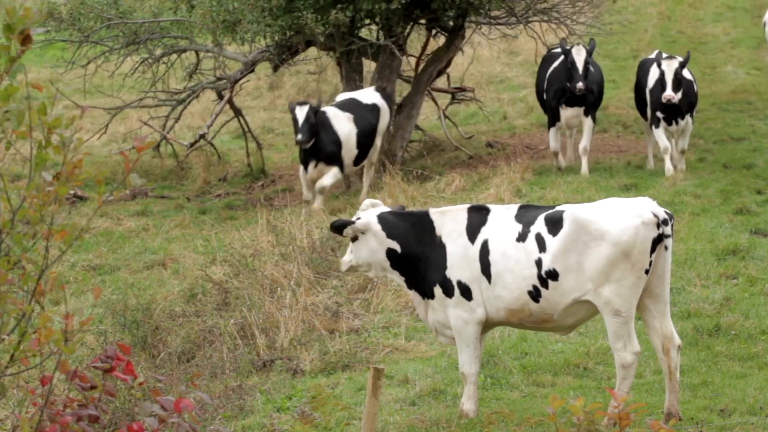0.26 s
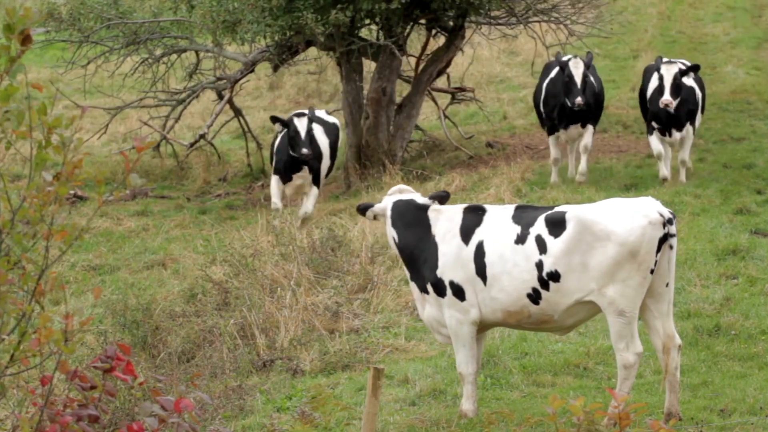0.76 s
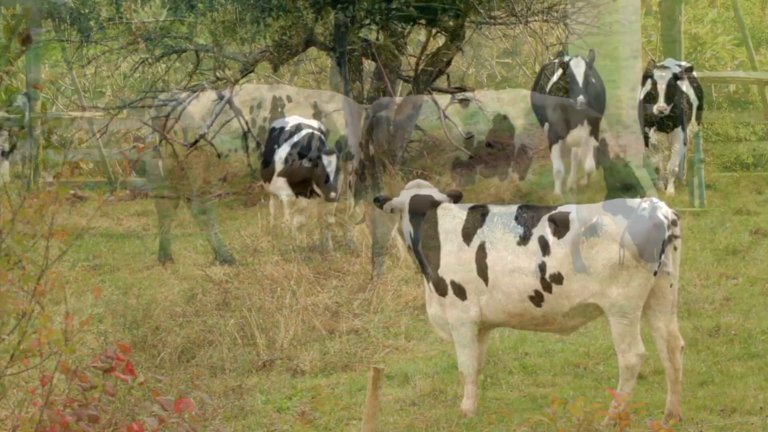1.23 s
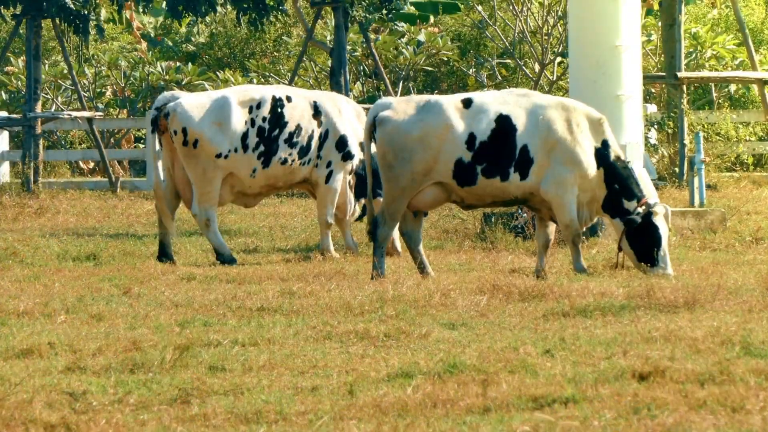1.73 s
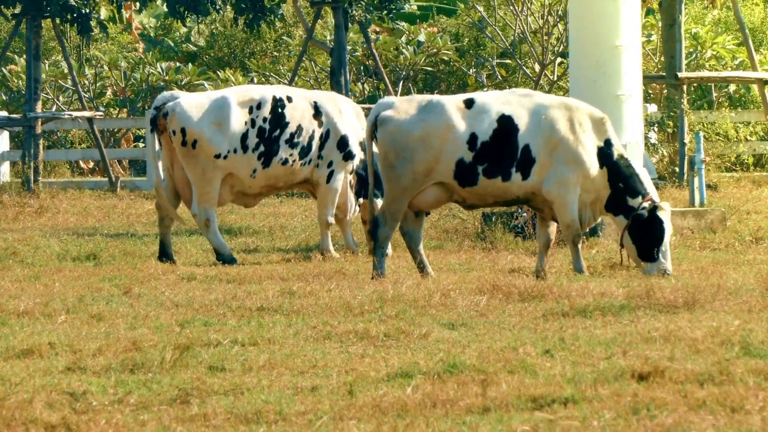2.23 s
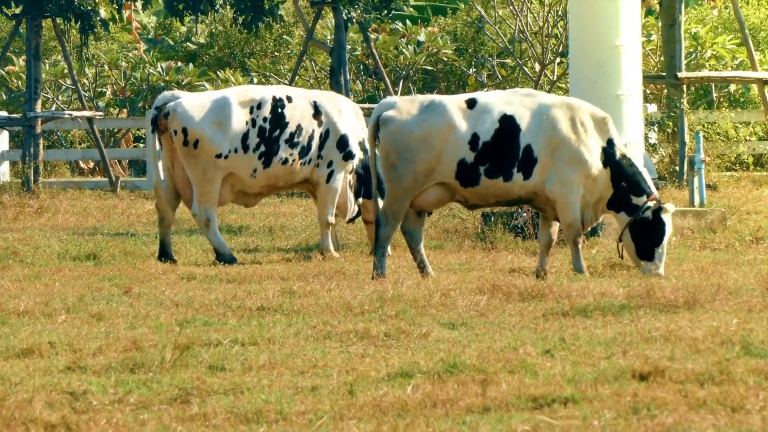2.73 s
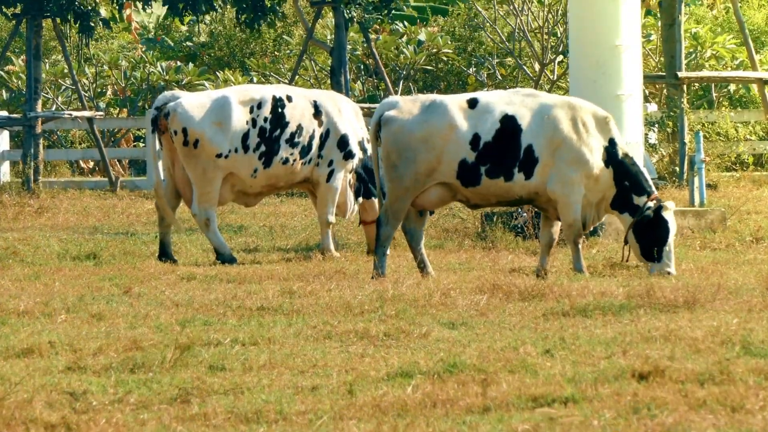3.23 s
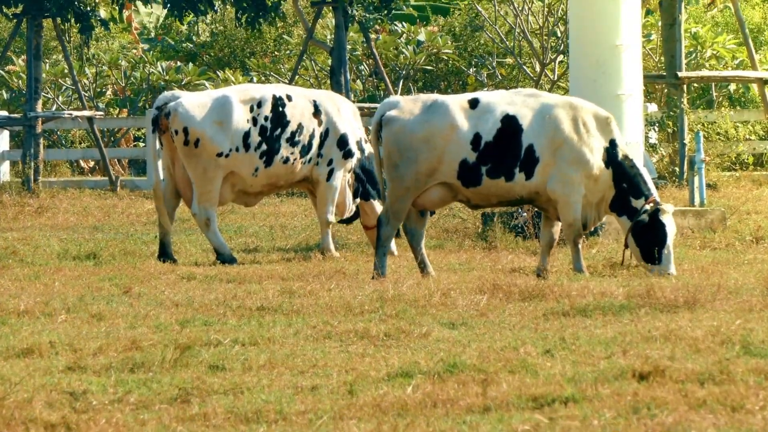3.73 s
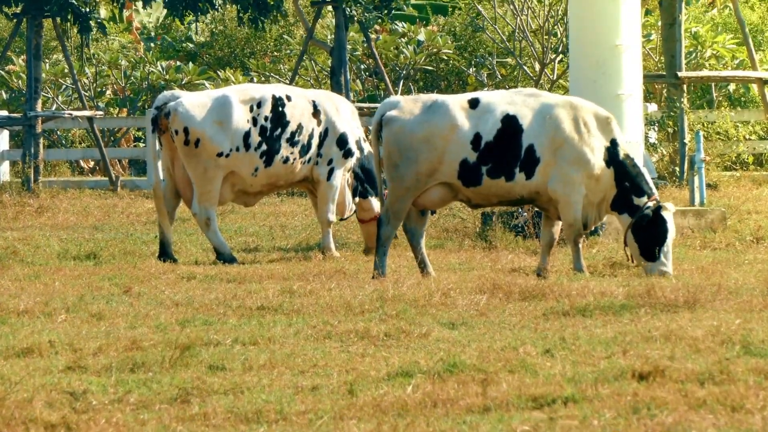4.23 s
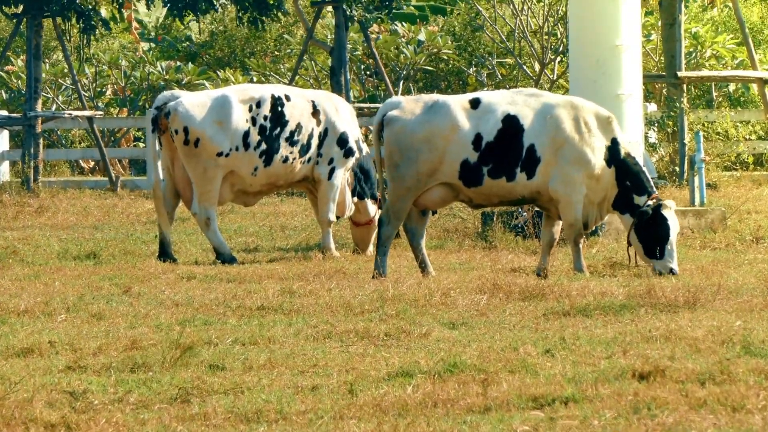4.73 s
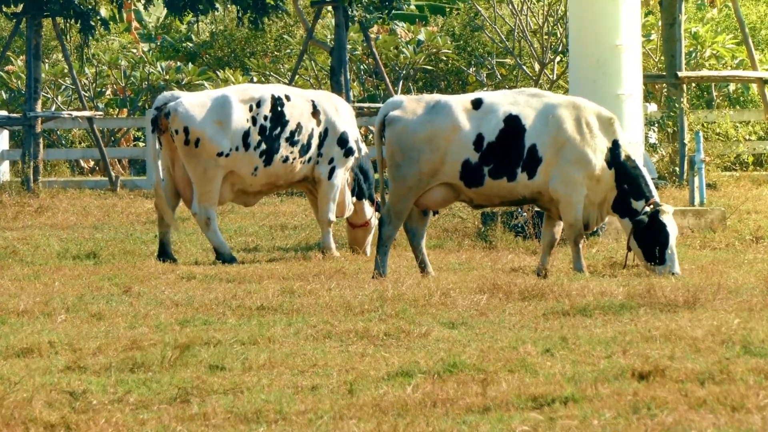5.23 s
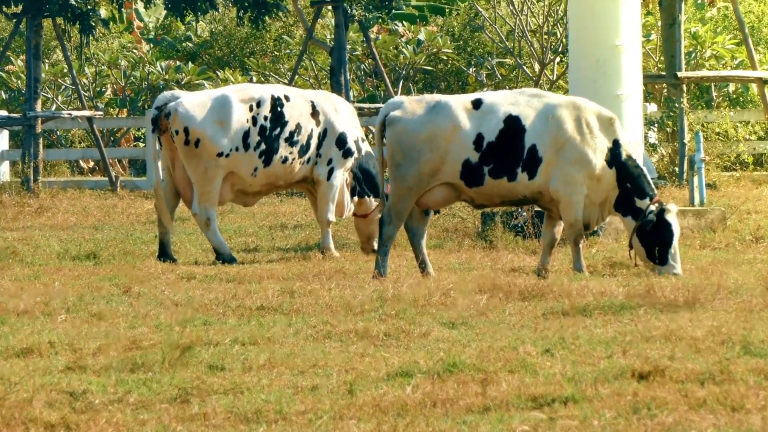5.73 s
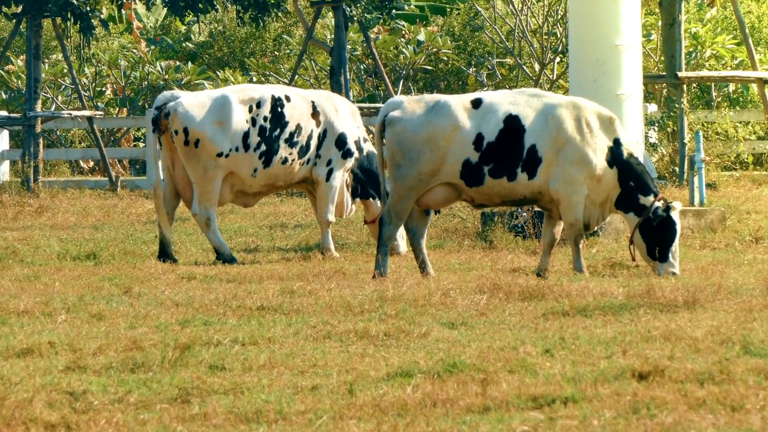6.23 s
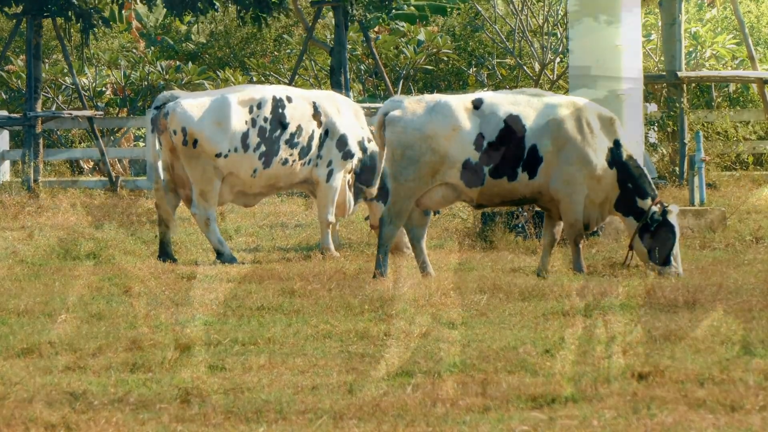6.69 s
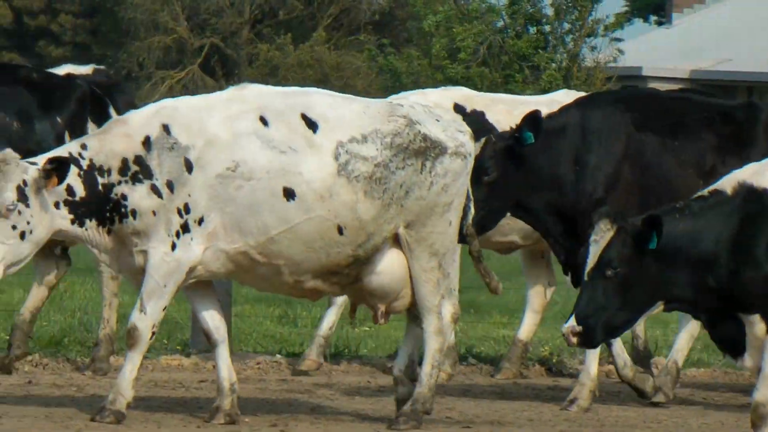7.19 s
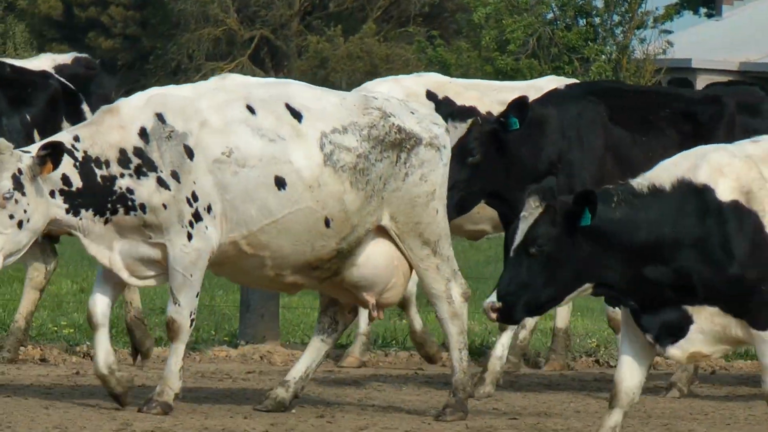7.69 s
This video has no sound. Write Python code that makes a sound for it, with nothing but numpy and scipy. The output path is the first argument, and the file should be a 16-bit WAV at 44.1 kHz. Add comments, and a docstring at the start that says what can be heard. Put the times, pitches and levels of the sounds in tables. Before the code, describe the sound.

Quiet pasture with birdsong; one near cow's rising moo bursts into a short loud bellow and rasping breath, before a herd shuffles in with a faint far moo.

```python
"""Pasture at the edge of a wood. Songbirds (gliding sines with a noise tail from the trees) call over a distant
rumble and a slow sway of wind pressure (shaped noise). From 3.4 s a near cow hums a rising moo and bellows
(throat-weighted harmonics, breath noise, nose and growl bands), rustles (noise puffs) and, from 4.6 s, draws a
hoarse breath (uneven slaps and noise through resonances). At 6.8 s the herd fades in (patchy noise, ringing
ticks); at 7 s another cow starts a low moo further off (harmonics)."""
import sys
import numpy as np
from scipy import signal
from scipy.fft import rfft, irfft
from scipy.io import wavfile

SR = 44100
rng = np.random.default_rng(int(sys.argv[2]) if len(sys.argv) > 2 else 0)


def materialize(psi):
    """Save the field psi as 16-bit PCM at rate SR to the path in sys.argv[1].

    A 1-D psi becomes a single channel; in a 2-D psi each row is a channel.
    """
    bounded = np.clip(np.atleast_2d(psi).T, -1, 1)
    quanta = np.round(bounded * 32767).astype(np.int16)
    wavfile.write(sys.argv[1], SR, quanta)


N = 350595
T = np.arange(N) / SR

# Near moo: (time [s], pitch [Hz], level [dB])
MOO_CURVE = [(3.4, 80.3, -56), (3.57, 91, -37.5), (3.75, 101.1, -36.5), (3.92, 120.7, -34.5),
             (3.985, 134.7, -37), (4.005, 137.8, -21.5), (4.1, 152.3, -18), (4.2, 172, -12),
             (4.25, 175.5, -13.5), (4.32, 182, -5.5), (4.38, 183.7, -7.5), (4.45, 183.2, -8),
             (4.505, 180.5, -8.5), (4.536, 170, -10), (4.543, 160, -23), (4.6, 135, -27), (4.625, 125, -33),
             (4.65, 120, -55)]
# Mouth: (time [s], opening [0 shut, 1 opening, 2 wide])
MOUTH_CURVE = [(3.5, 0.16), (3.95, 0.51), (4.06, 1.225), (4.26, 1.284), (4.32, 1.74), (4.5, 1.68),
               (4.55, 1.12)]
# Throat gain on the harmonics, by mouth position: (frequency [Hz], gain [dB])
THROAT_SHUT = [(47, -30), (80, 18.5), (203, 16), (302, -2), (709, 2), (957, -5.5), (1120, -21), (1420, -10),
               (1920, -30), (2010, -16), (2360, -25), (2940, -19), (3500, -19), (4550, -59), (7700, -120)]
THROAT_OPENING = [(71, -33.5), (120, -1), (303, 12.5), (463, -5), (799, 12), (1130, -9), (1510, -9),
                  (2050, -25), (2450, -26), (2650, -45), (3220, -46), (3580, -47), (4500, -60),
                  (5850, -81.5), (9900, -120)]
THROAT_WIDE = [(88, -33.5), (150, -6.5), (194, 6.5), (357, -18.5), (517, 18), (563, 0.5), (901, -35.5),
               (1230, -4.5), (1480, -17), (2370, -41.5), (2770, -32), (3060, -63.5), (3740, -33),
               (4500, -57), (5850, -90), (9900, -120)]
# Breath noise spectrum, mouth shut and open: (frequency [Hz], relative density [dB per Hz])
BREATH_SHUT_SPECTRUM = [(150, -22), (700, -12), (1150, -28), (1500, -21), (1700, -28), (1900, -20),
                        (2150, -30), (2700, -35), (3050, -32), (3550, -30), (4300, -36), (5200, -34),
                        (6300, -38), (7500, -46), (12000, -46), (15500, -56)]
BREATH_OPEN_SPECTRUM = [(110, -33.5), (500, -13.5), (800, -13.5), (1400, -15.5), (2000, -30.5), (2700, -28),
                        (3100, -48.5), (3700, -38), (4500, -41.5), (6000, -37.5), (7500, -44), (9000, -45),
                        (12000, -49.5), (15500, -62)]
# Nose resonances, and last a wide growl band near 1600 Hz: (frequency [Hz], width [Hz])
NOSE_AND_GROWL_BANDS = [(1874, 73), (3100, 140), (3540, 490), (5050, 410), (1600, 420)]
# Swells of the nose, and last of the growl as the mouth opens:
# (band index, peak time [s], peak level [dB], rise [dB/s], fall [dB/s])
NOSE_AND_GROWL_SWELLS = [(0, 3.78, -57, 150, 40), (0, 3.85, -52.5, 60, 40), (1, 3.68, -55, 76, 60.5),
                         (1, 4.035, -45.5, 354, 148), (2, 3.72, -49.5, 116, 61), (3, 3.68, -54, 164, 100),
                         (4, 4.11, -33.5, 129, 199)]
# Hoarse breath: (time [s], level [dB])
HOARSE_CURVE = [(4.6, -63), (4.67, -23), (4.78, -18.5), (4.95, -16.5), (5.0, -22), (5.06, -17.5),
                (5.26, -26.5), (5.36, -39), (5.49, -46.5), (5.6, -76)]
# Mouth resonances in the hoarse breath: (frequency [Hz], width [Hz], level [dB])
HOARSE_RESONANCES = [(585, 90, -10), (685, 55, -1), (800, 55, -2.5), (920, 110, -14), (1050, 120, -17),
                     (1300, 70, -20), (1600, 250, -22), (2130, 120, -34)]
# Air noise in the hoarse breath: (frequency [Hz], relative density [dB per Hz])
HOARSE_AIR_SPECTRUM = [(100, -13.5), (200, 3), (400, 1.5), (1000, -17), (1600, -9), (2200, -29.5),
                       (3000, -30.5), (4500, -35), (5800, -33.5), (7000, -37), (11000, -44), (15500, -48.5)]
# Rasps high in the throat: (peak time [s], peak level [dB])
THROAT_RASPS = [(4.69, -46.5), (4.86, -57.5), (5.049, -63), (5.26, -50.5)]
# Rustles: (time [s], rise [s], hold [s], fall [s], level before RUSTLE_BOOST_DB [dB])
RUSTLE_PUFFS = [(3.558, 0.021, .01, .09, -66.5), (3.893, 0.011, 0.012, 0.15, -66.5),
                (4.752, 0.023, 0.017, 0.046, -62), (5.032, 0.014, 0.038, 0.048, -52),
                (5.205, 0.023, .015, 0.048, -65), (5.331, 0.018, 0.022, 0.18, -61)]
# Rustle spectrum: (frequency [Hz], relative density [dB per Hz])
RUSTLE_SPECTRUM = [(880, -29.5), (1500, -9), (1920, -7.5), (2110, -6.5), (3070, -11), (4450, -13.5),
                   (6860, -19), (11300, -17.5), (15600, -31.5)]
# Farm building echoes, before their treble loss: (delay [s], level [dB])
BUILDING_ECHOES = [(.045, -20), (.085, -29), (.125, -24), (.16, -23)]
# Bird notes by kind of call: (delay [s], length [s], start, middle, end pitch [Hz], level against the call [dB])
CALL_NOTES = { "phrase": [(.0, .012, 2300, 2400, 2450, -2), (.01, .01, 2100, 2080, 2050, -3),
              (.016, .013, 2650, 2750, 2800, -3), (.022, .018, 2200, 2150, 2100, -1),
              (.035, .013, 2800, 2870, 2950, -3), (.042, .026, 2020, 2000, 2000, 0),
              (.072, .014, 1780, 1700, 1650, -7), (.088, .014, 1760, 1690, 1650, -8),
              (.103, .014, 1760, 1690, 1650, -8), (.118, .016, 1750, 1680, 1640, -10)],
              "dip": [(0, .025, 3550, 3850, 3750, -5), (.023, .042, 3750, 3450, 3450, 0)],
              "flick": [(0, .025, 3500, 4300, 4850, 0)], "upslur": [(0, .03, 4500, 5000, 5150, -2),
              (.03, .06, 5150, 5100, 5050, 0)], "downslur": [(0, .08, 4600, 3850, 3750, 0)],
              "seep": [(0, .04, 6600, 7300, 7850, 0), (.035, .26, 7850, 7700, 7570, -1)],
              "chip": [(0, .03, 3300, 2900, 2300, 0)], "burr": [(0, .02, 2100, 2900, 3800, -2),
              (.018, .012, 3200, 2800, 2500, -4), (.03, .014, 2600, 2950, 3100, -2)],
              "hook": [(0, .055, 3900, 4450, 3300, 0), (.06, .04, 3350, 3500, 3500, -2)],
              "rise": [(0, .08, 2600, 3000, 3300, 0)], "arch": [(0, .045, 2450, 2750, 2680, 0)],
              "drop": [(0, .047, 2200, 1700, 1800, 0)], "pipe": [(0, .05, 1400, 1380, 1365, 0)],
              "glide": [(0, .5, 5300, 4700, 4150, 0)], "slide": [(0, .015, 2300, 2700, 2500, -2),
              (.012, .04, 2400, 2150, 1950, 0), (.055, .05, 1850, 1720, 1680, -3)],
              "peep": [(0, .04, 3400, 3450, 3400, 0)], "held": [(0, .14, 2080, 2000, 1920, 0)]}
# Bird calls by kind: (time [s], pitch shift [semitones], level [dB])
CALL_TIMES = { "slide": [(2.98, 0, -60), (3.272, 0, -58), (3.565, 0, -57), (3.86, 0, -58)],
              "phrase": [(5.572, 0.012, -51.5), (5.812, 0, -51), (6.055, 0, -50.5), (6.305, 0.006, -51.5),
              (6.568, 0.011, -51.5), (6.815, 0, -53), (7.085, 0, -50), (7.345, 0.00042, -51),
              (7.61, 0, -53), (7.875, 0.0044, -50.5)], "dip": [(2.777, 0.043, -48.5), (5.915, 0.026, -46),
              (7.3, 0.13, -45)], "flick": [(.622, 0.0042, -52.5), (5.965, 0, -51.5)],
              "upslur": [(.005, 0, -63), (.925, 0, -68.5), (2.045, 0, -66), (3.295, 0, -67),
              (5.555, 0.13, -68.5)], "downslur": [(.15, 1, -62.5), (1.86, 3, -74), (2.17, 3, -63),
              (5.72, 1.5, -62), (6.175, 0, -65)], "seep": [(1.065, 0, -76), (2.915, 0, -78)],
              "chip": [(.33, 3, -68), (.8, 1.5, -66), (1.245, -3, -60.5), (1.255, 4, -65),
              (1.285, 2.5, -64), (1.56, 2, -64), (1.68, 3, -65.5), (1.895, -7, -62), (2.04, 3, -67),
              (5.62, 3, -64)], "rise": [(.63, 0.0066, -64), (.865, 0.0043, -61)],
              "burr": [(.005, -1.7, -59), (.69, -1.1, -58.5), (1.455, -0.6, -54.5), (1.49, -1.1, -59),
              (1.76, -1, -60), (2.23, -0.11, -57.5), (2.665, 0.14, -64), (3.085, -0.057, -59)],
              "hook": [(1.01, 0.23, -64.5), (1.385, 0.77, -65.5)], "arch": [(.445, 0.2, -67),
              (5.66, 3.5, -65), (5.8, 1.5, -56), (5.908, -0.5, -51), (6.25, 0.5, -53), (6.35, 2, -53.5),
              (6.72, 0.5, -54.5), (6.835, 0, -50.5), (7.23, .5, -58)], "drop": [(2.36, 0, -65),
              (2.445, 0, -64), (2.61, 0, -64), (2.67, 0, -63), (2.745, 0, -63)],
              "pipe": [(1.48, 0.012, -64), (1.81, 0, -60), (2.14, 0, -62)], "glide": [(2.62, 0, -79)],
              "peep": [(.585, 0, -50.5), (.41, -1.6, -65), (6.47, 2, -65)], "held": [(.19, 0.018, -67.5),
              (.88, 0, -70)]}
# Far moo: (time [s], pitch [Hz], level [dB])
FAR_MOO_CURVE = [(7.0, 95.7, -69), (7.14, 94.4, -53.5), (7.25, 104, -48), (7.36, 110.9, -65),
                 (7.5, 102.5, -47.5), (7.58, 103.1, -52), (7.72, 113.5, -47), (7.87, 112.9, -52.5),
                 (7.95, 117.6, -54)]
# Far cow's throat, before the brightness tilt: (frequency [Hz], gain [dB])
FAR_THROAT_GAIN = [(90, 2.5), (230, 0.5), (400, -25), (790, -2), (1100, -18), (1470, -5.5), (1700, -18),
                   (2150, -4.5), (2450, -33), (2750, -2), (3300, -21), (4080, -3), (4600, -27)]
# Herd shuffle: (frequency [Hz], relative density [dB per Hz])
HERD_SPECTRUM = [(30, -7), (60, -1.5), (102, -3.5), (147, -2.5), (211, -6.5), (274, -21), (437, -17.5),
                 (3150, -17.5), (7630, -26), (9500, -36.5), (10500, -61), (15000, -73)]
# Lone hoof ticks: (time [s], impulse strength before the resonances [dB])
HOOF_KNOCKS = [(7.026, -11.5), (7.049, -15), (7.24, -14)]
# Distant rumble: (frequency [Hz], relative density [dB per Hz])
RUMBLE_SPECTRUM = [(8, -4), (20, -6), (45, -5), (103, -1.5), (153, -5.5), (282, -14), (686, -15.5),
                   (1010, -20.5), (1540, -34), (2500, -41), (4500, -47), (5850, -53), (9000, -58),
                   (15500, -61)]

# breath against the voice: mouth shut, wide, after the break
BREATH_HUM_DB, BREATH_BELLOW_DB, BREATH_SPENT_DB = -11, -26.5, -14.5
# voice unrest at its most, with the mouth half open; flicker is then weighted by harmonic number
UNSTEADY_WOBBLE, UNSTEADY_FLICKER_DB = .004, 2.6
# the voice breaks into rough noise as the bellow stops
BREAK_S, BREAK_DB, BREAK_RISE_DB_PER_S, BREAK_FALL_DB_PER_S = 4.54, -19, 500, 260
FLUTTER_HZ = 114.2  # mean slap rate of the slack folds
CHEST_S, CHEST_DB, CHEST_RISE_DB_PER_S, CHEST_FALL_DB_PER_S = 4.79, -19, 200, 45
AIR_START_S, AIR_DB, AIR_RISE_DB_PER_S, AIR_SAG_DB_PER_S = 4.67, -33, 160, 8.5
AIR_END_S, AIR_FALL_DB_PER_S = 5.316, 74
RASP_FADE_DB_PER_S = 152
RUSTLE_BOOST_DB = 10.5
WOOD_T60_S, WOOD_MAX_DB = .7, -64.5  # the tail is no louder for a near bird than for a far one
WOOD_TILT_DB_PER_OCTAVE = 7  # below 3 kHz: leaves scatter low notes less
CHATTER_PER_S, CHATTER_MIN_DB = 40, -78
FAR_OPENS_S, FAR_SHUT_TILT_DB_PER_OCTAVE, FAR_OPEN_TILT_DB_PER_OCTAVE = 7.68, -3, 0
HERD_IN_S, HERD_IN_DB, HERD_FADE_DB_PER_S, HERD_SWELL_DB_PER_S = 6.846, -51, 89, 4
RUMBLE_DB = -49.5
SWAY_DB, SWAY_HZ = -45, 3
CUTOFF_HZ = 15700


def moo():
    """The throat colour moves with the mouth; breath puffs once a cycle; slaps and noise ring nose and growl."""
    span, (pitch_hz, level_db) = in_time(MOO_CURVE)
    t = T[span]
    mouth = np.clip(np.interp(t, *np.transpose(MOUTH_CURVE)), 0, 2)
    shut, opening, wide = [np.clip(1 - abs(mouth - k), 0, 1) for k in range(3)]

    def throat_db(hz):
        return (shut * at_hz(THROAT_SHUT, hz) + opening * at_hz(THROAT_OPENING, hz)
                + wide * at_hz(THROAT_WIDE, hz))

    unsteady = opening ** 1.5
    voice, phase = harmonics(pitch_hz, throat_db, wobble=.001 + UNSTEADY_WOBBLE * unsteady, shimmer_db=1.1,
                             flicker_db=UNSTEADY_FLICKER_DB * unsteady, count=30)

    voiced_breath_db = BREATH_HUM_DB + (BREATH_BELLOW_DB - BREATH_HUM_DB) * mouth / 2
    breath_db = np.where(t < BREAK_S, voiced_breath_db, BREATH_SPENT_DB)
    breath = shut * coloured(BREATH_SHUT_SPECTRUM, len(t))
    breath = breath + (1 - shut) * coloured(BREATH_OPEN_SPECTRUM, len(t))
    puffs = 1 + .45 * np.cos(phase)
    sound = amp(level_db) * (voice + amp(breath_db) * breath * puffs)

    slaps = rms_one(np.diff(np.floor(phase / (2 * np.pi)), prepend=0))
    source = slaps + rng.standard_normal(len(t))
    rings = [ring(source, hz, width_hz) for hz, width_hz in NOSE_AND_GROWL_BANDS]
    for index, *shape in NOSE_AND_GROWL_SWELLS:
        sound += swell(t, *shape) * rings[round(index)]

    break_gain = swell(t, BREAK_S, BREAK_DB, BREAK_RISE_DB_PER_S, BREAK_FALL_DB_PER_S)
    sound += break_gain * coloured(THROAT_OPENING, len(t))
    return placed(sound, span)


def hoarse_breath():
    """Slack folds slap unevenly, half drowned in air noise, and ring the mouth, throat and chest."""
    span, (level_db,) = in_time(HOARSE_CURVE)
    t, size = T[span], len(level_db)
    cycles = np.cumsum(FLUTTER_HZ * (1 + .018 * drift(30, size))) / SR
    slaps = np.diff(np.floor(cycles), prepend=0) * amp(1.5 * rng.standard_normal(size))
    puffs = 1 + .25 * np.cos(2 * np.pi * cycles)
    source = rms_one(slaps) + 1.6 * rng.standard_normal(size) * puffs

    mouth = np.zeros(size)
    for k, (hz, width_hz, db) in enumerate(HOARSE_RESONANCES):
        mouth += (-1) ** k * amp(db) * ring(source, hz, width_hz)  # neighbours in opposite sign
    sound = amp(level_db) * rms_one(mouth)

    chest = rms_one(resonance(resonance(source, 240, 16), 242, 40))
    sound += swell(t, CHEST_S, CHEST_DB, CHEST_RISE_DB_PER_S, CHEST_FALL_DB_PER_S) * chest

    air_gain = swell(t, AIR_START_S, AIR_DB, AIR_RISE_DB_PER_S, AIR_SAG_DB_PER_S)
    air_gain = air_gain * swell(t, AIR_END_S, 0, 0, AIR_FALL_DB_PER_S)
    sound += air_gain * coloured(HOARSE_AIR_SPECTRUM, size)

    rasp = rms_one(resonance(resonance(source, 2600, 980), 2960, 1100))
    for s, db in THROAT_RASPS:
        sound += swell(t, s, db, RASP_FADE_DB_PER_S, RASP_FADE_DB_PER_S) * rasp
    return placed(sound, span)


def rustles():
    """Bright puffs of noise, each with a rise, hold and fall in dB."""
    gain = np.zeros(N)
    for s, rise_s, hold_s, fall_s, db in RUSTLE_PUFFS:
        corners_s = np.cumsum([s - .02, .02, rise_s, hold_s, fall_s, .05])
        gain += amp(np.interp(T, corners_s, [-120, db - 16, db, db, db - 16.5, -120]))
    return gain * amp(RUSTLE_BOOST_DB) * coloured(RUSTLE_SPECTRUM, N)


def building_echoes(cow):
    """The farm buildings return smeared echoes with less treble."""
    response = np.zeros(SR // 4)
    for delay_s, db in BUILDING_ECHOES:
        start = int(delay_s * SR)
        smear = rng.standard_normal(300) * np.hanning(300)
        response[start:start + 300] += amp(db) * smear / np.sqrt(np.sum(smear ** 2))
    response = signal.lfilter([.3], [1, -.7], response)
    return signal.fftconvolve(cow, response)[:N]


def birds():
    """Each note is a fluttering sine on a bent glide; the trees return a decaying noise tail."""
    near, scattered = np.zeros(N + SR), np.zeros(N + SR)
    waver, flutter = drift(140, N + SR), drift(90, N + SR)
    for s, length_s, start_hz, middle_hz, end_hz, db in calls() + chatter():
        u = np.linspace(0, 1, int(length_s * SR))
        first = max(int(s * SR), 0)
        span = slice(first, first + len(u))
        hz = np.interp(u, [0, .5, 1], [start_hz, middle_hz, end_hz]) * (1 + .012 * waver[span])
        envelope = np.sin(np.pi * u) ** .5 * amp(3.5 * flutter[span])
        note = envelope * whistle(2 * np.pi * np.cumsum(hz) / SR)
        near[span] += amp(db) * note
        tilt_db = WOOD_TILT_DB_PER_OCTAVE * min(np.log2(middle_hz / 3000), 0)
        scattered[span] += amp(min(db, WOOD_MAX_DB) + tilt_db) * note
    tail = rng.standard_normal(SR) * amp(-60 * T[:SR] / WOOD_T60_S)
    tail *= T[:SR] > .012  # first return after 12 ms
    tail /= np.sqrt(np.sum(tail ** 2))
    return near[:N] + signal.fftconvolve(scattered, tail)[:N]


def calls():
    """Every call spelt out as notes (time [s], length [s], three pitches [Hz], level [dB])."""
    notes = []
    for kind, rows in CALL_TIMES.items():
        for s, shift, db in rows:
            for delay_s, length_s, *hz, rel_db in CALL_NOTES[kind]:
                notes.append((s + delay_s, length_s, *(np.array(hz) * 2 ** (shift / 12)), db + rel_db))
    return notes


def chatter():
    """A faint floor of short random glides, about 1.5-5.8 kHz, mostly heard as blurred tail; rows as in calls()."""
    draws = rng.random((int(CHATTER_PER_S * N / SR), 5))
    start_s, length_s = draws[:, 0] * N / SR, .015 + .04 * draws[:, 1]
    hz = 2000 * 2.3 ** draws[:, 2]
    end_hz = hz * (.75 + .5 * draws[:, 3])
    level_db = CHATTER_MIN_DB + 6 * draws[:, 4]
    return list(zip(start_s, length_s, hz, (hz + end_hz) / 2, end_hz, level_db))


def whistle(phase):
    """A sine with faint second and third partials."""
    return np.sin(phase) + amp(-32) * np.sin(2 * phase) + amp(-36) * np.sin(3 * phase)


def far_moo():
    """A clean low voice that brightens as the mouth opens."""
    span, (pitch_hz, level_db) = in_time(FAR_MOO_CURVE)
    tilt_db = np.interp(T[span], [FAR_OPENS_S - .02, FAR_OPENS_S + .024],
                        [FAR_SHUT_TILT_DB_PER_OCTAVE, FAR_OPEN_TILT_DB_PER_OCTAVE])

    def throat_db(hz):
        return at_hz(FAR_THROAT_GAIN, hz) + tilt_db * np.log2(hz / 200)

    voice, _ = harmonics(pitch_hz, throat_db, wobble=.00227, shimmer_db=1.0, flicker_db=.46, count=37)
    return placed(amp(level_db) * voice, span)


def herd():
    """Many hooves on dirt blur to a patchy shuffle that draws slowly nearer, with a few lone ticks."""
    level = swell(T, HERD_IN_S, HERD_IN_DB, HERD_FADE_DB_PER_S, -HERD_SWELL_DB_PER_S)
    shuffle = level * amp(1.4 * drift(11, N)) * coloured(HERD_SPECTRUM, N)
    knocks = np.zeros(N)
    for s, db in HOOF_KNOCKS:
        knocks[int(s * SR)] = amp(db)
    return shuffle + resonance(knocks, 1950, 500) - .64 * resonance(knocks, 1050, 400)


def rumble():
    """Distant low-weighted noise with a slight level drift."""
    return amp(RUMBLE_DB + .18 * drift(12, N)) * coloured(RUMBLE_SPECTRUM, N)


def wind_sway():
    """Wind pressure sways slowly on the microphone; 0.1 s fade-in."""
    return amp(SWAY_DB) * np.minimum(10 * T, 1) * drift(SWAY_HZ, N)


def harmonics(pitch_hz, throat_db, wobble, shimmer_db, flicker_db, count):
    """Harmonics weighed by the throat they pass, evened to rms 1; also the phase of the vocal folds."""
    phase = 2 * np.pi * np.cumsum(pitch_hz * (1 + wobble * drift(25, len(pitch_hz)))) / SR
    voice, power = 0, 0
    for k in range(1, count + 1):
        gain = amp(throat_db(k * pitch_hz))
        unrest_db = shimmer_db * drift(6.8, len(phase)) + flicker_db * drift(28, len(phase))
        unrest_db = unrest_db * np.log(k + .57)  # higher harmonics vary more
        voice = voice + gain * amp(unrest_db) * np.sin(k * phase + .35 * k * k)
        power = power + gain ** 2 / 2
    return voice / np.sqrt(power), phase


def resonance(x, hz, width_hz):
    """Two-pole band with gain 1 on top."""
    r = np.exp(-np.pi * width_hz / SR)
    zeros = np.array([1, 0, -1]) * (1 - r * r) / 2
    return signal.lfilter(zeros, [1, -2 * r * np.cos(2 * np.pi * hz / SR), r * r], x)


def ring(x, hz, width_hz):
    """Two resonances in series, one twice as wide, at rms 1."""
    return rms_one(resonance(resonance(x, hz, 2 * width_hz), hz, width_hz))


def coloured(spectrum, size):
    """Noise of a given spectrum, rms 1."""
    hz = np.maximum(np.arange(size // 2 + 1) * SR / size, 1)
    return rms_one(irfft(rfft(rng.standard_normal(size)) * amp(at_hz(spectrum, hz)), size))


def drift(rate_hz, size):
    """Low-passed noise, rms 1; the first second is dropped to settle."""
    r = np.exp(-2 * np.pi * rate_hz / SR)
    return rms_one(signal.lfilter([1], [1, -2 * r, r * r], rng.standard_normal(size + SR))[SR:])


def swell(t, s, db, rise_db_per_s, fall_db_per_s):
    """Gain with straight dB slopes before and after s, where it is db."""
    return amp(db - np.where(t < s, rise_db_per_s * (s - t), fall_db_per_s * (t - s)))


def in_time(rows):
    """Sample range of a curve table, and its columns over that range."""
    s, *columns = np.transpose(rows)
    span = slice(max(int(s[0] * SR), 0), min(int(s[-1] * SR), N))
    return span, [np.interp(T[span], s, c) for c in columns]


def placed(sound, span):
    """The sound in its sample range, silence elsewhere."""
    out = np.zeros(N)
    out[span] = sound
    return out


def at_hz(points, hz):
    """A spectrum read on a log-frequency axis."""
    points = np.array(points)
    return np.interp(np.log(hz), np.log(points[:, 0]), points[:, 1])


def amp(db):
    """Gain of a dB value."""
    return 10 ** (np.asarray(db) / 20)


def rms_one(x):
    """Scaled to rms 1."""
    return x / np.sqrt(np.mean(x ** 2) + 1e-20)


def scene():
    """Sum of all sources, one channel; only the near cow's voice and breath are echoed by the buildings."""
    cow = moo() + hoarse_breath()
    cow = cow + building_echoes(cow)
    mix = cow + rustles() + birds() + far_moo() + herd() + rumble() + wind_sway()
    return mix[None]


def record(dry):
    """The loudest peaks are rounded and the top is cut."""
    rounded = 1.1 * np.tanh(dry / 1.1)
    low_pass = signal.ellip(10, .3, 70, CUTOFF_HZ, fs=SR, output="sos")
    return signal.sosfilt(low_pass, rounded)


dry = scene()
out = record(dry)
materialize(out)
```